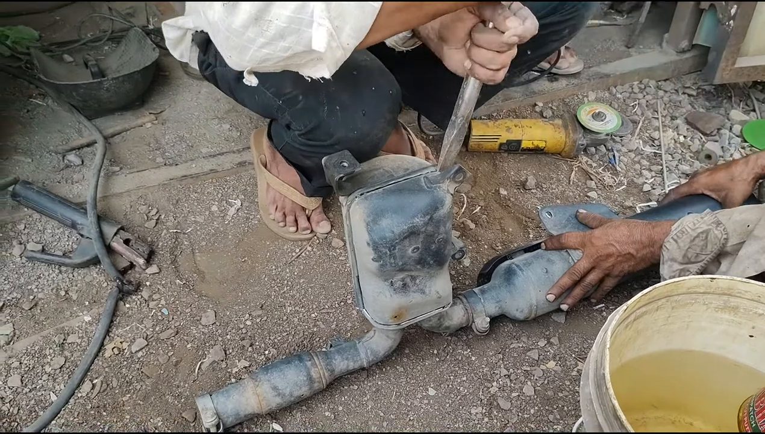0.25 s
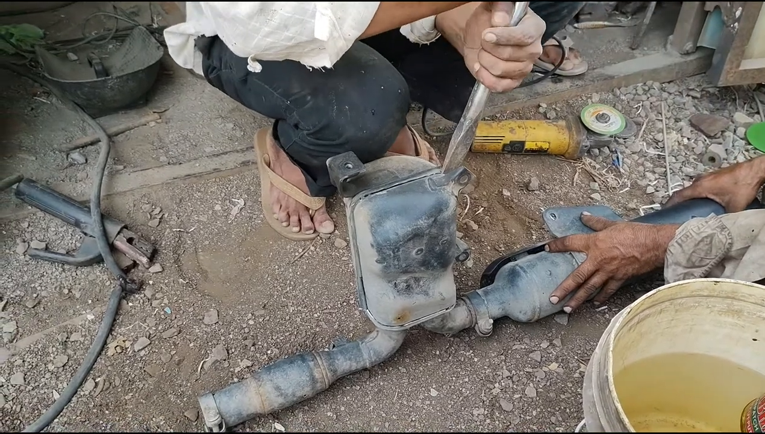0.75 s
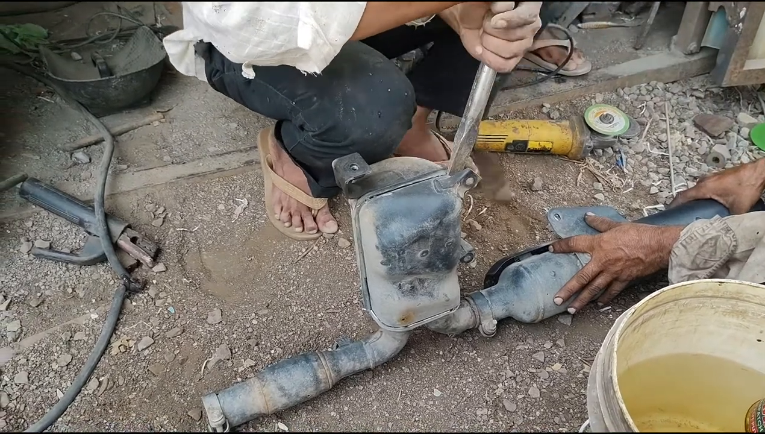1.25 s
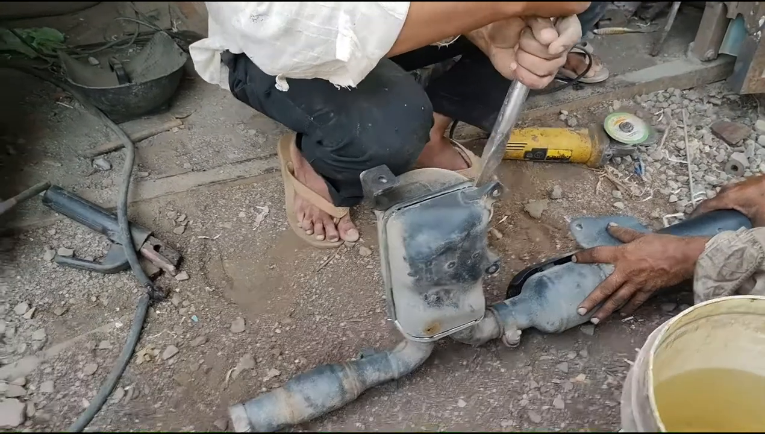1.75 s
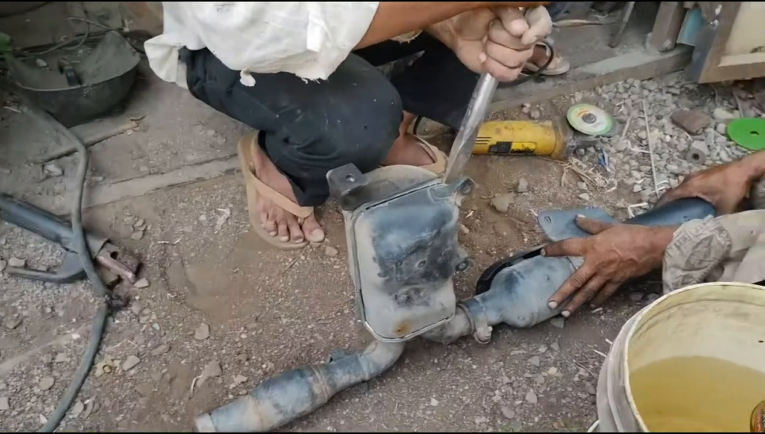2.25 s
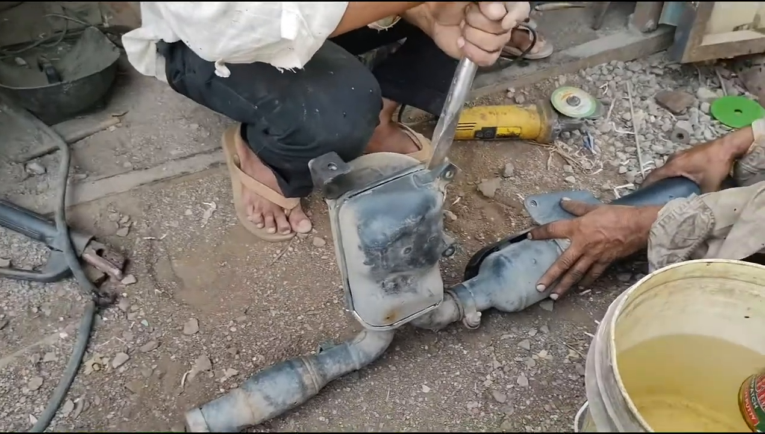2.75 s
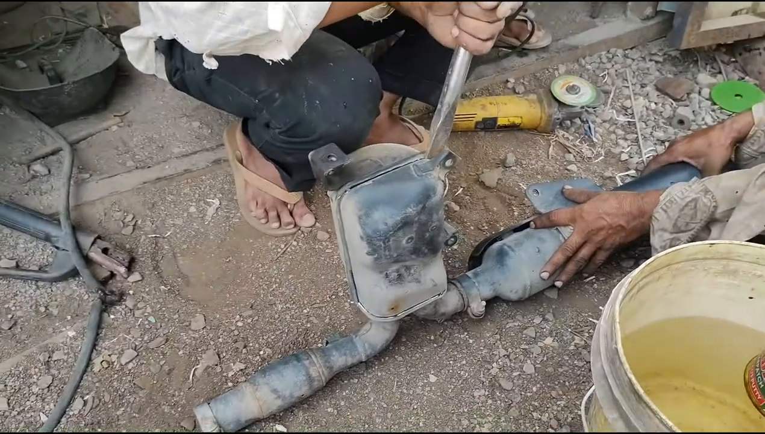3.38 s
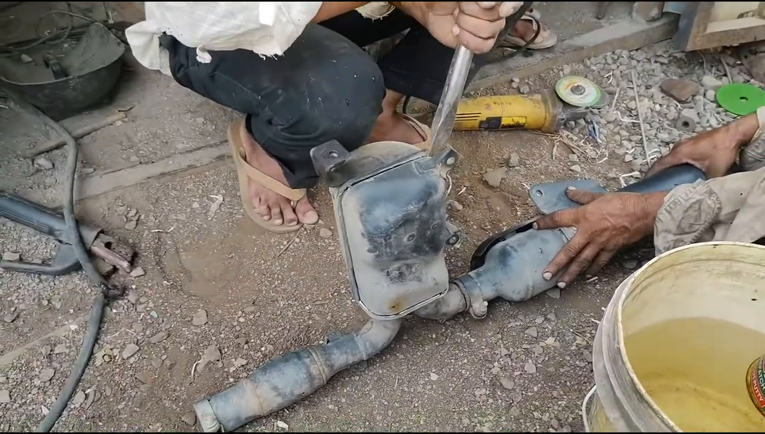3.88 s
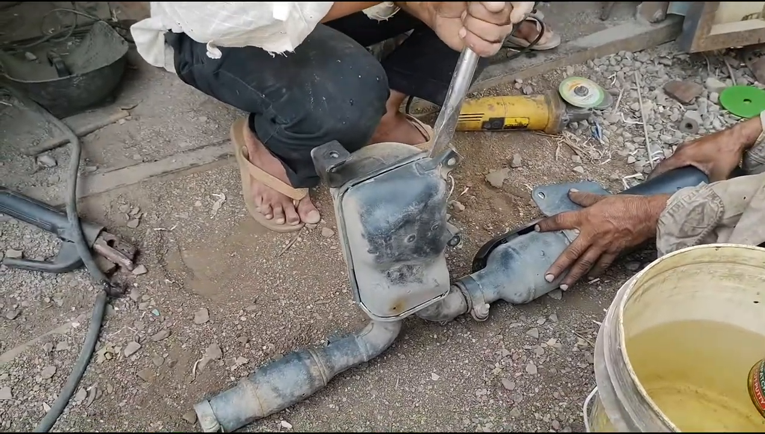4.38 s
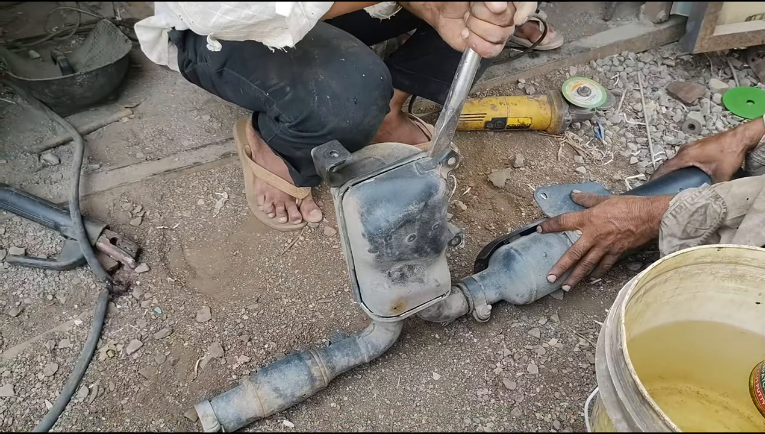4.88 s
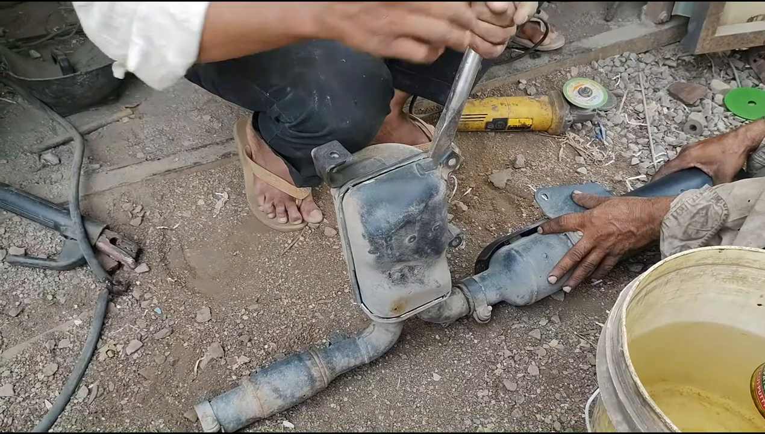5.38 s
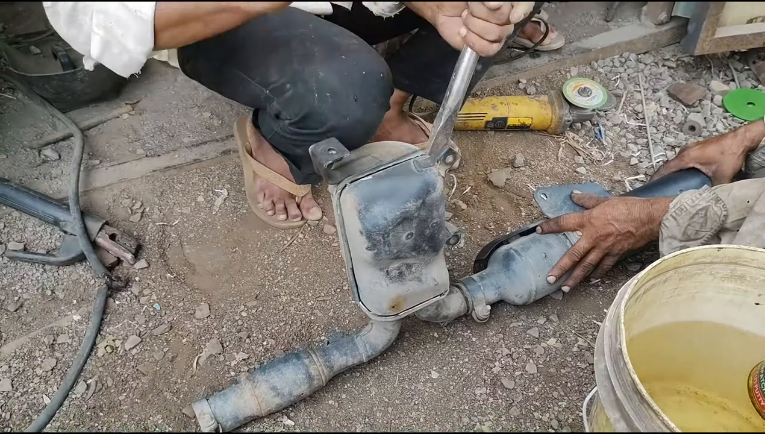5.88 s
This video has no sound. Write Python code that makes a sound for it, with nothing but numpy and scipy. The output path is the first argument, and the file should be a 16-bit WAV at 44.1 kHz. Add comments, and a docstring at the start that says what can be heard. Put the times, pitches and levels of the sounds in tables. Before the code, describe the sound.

Faint distant traffic and hiss fill the first second and a half. Then steel strikes steel, very near and loud: a muffled, wedged clank with a ground thud, followed by eight increasingly bright, clangy blows on thin hollow sheet metal. The last catches slightly and turns deeper. Each has a sharp crack, brief high ping and rattling decay, with slap echoes and a short open-yard tail. Phone-like sound, loud peaks held down.

```python
"""Chiselling open a car muffler in a yard

Close to the microphone, nine hammer blows drive a steel chisel into the seam of a muffler on the ground.
Each blow sums noise bursts and decaying modes of chisel and sheet steel; the edge starts wedged tight, works
free and catches again on the last blow, while the clang deepens as the seam opens. Delayed copies and noise
tails return from the yard; shaped noise makes the road and a faint whine; the phone's limiter ducks the peaks."""
import sys
import numpy as np
from scipy import signal
from scipy.fft import rfft, irfft, next_fast_len
from scipy.io import wavfile
from scipy.ndimage import uniform_filter1d, minimum_filter1d

SR = 44100
rng = np.random.default_rng(int(sys.argv[2]) if len(sys.argv) > 2 else 0)


def bounce(signal):
    """Save signal as a 16-bit WAV file at the path given by the first command-line argument."""
    frames = np.transpose(np.atleast_2d(signal))
    limited = np.clip(frames, -1, 1)
    pcm = np.round(limited * 32767).astype(np.int16)
    wavfile.write(sys.argv[1], SR, pcm)


N = 270333  # length of the scene in samples
RING = 40000  # longest single sound in samples, about 0.9 s
AGE = np.arange(RING) / SR  # seconds since contact


def hammering():
    """Every blow, heard close by and as sent towards the walls; grip and seam opening set its sound."""
    # Hammer blows. Each row: start in seconds, level in dB, grip of the seam on the edge from 0 to 1,
    # clang of the shell in dB, frequency in Hz that the spot under the edge favours.
    blows = [(1.6003, 2.5, 0.86, -6, 690), (2.0621, 6, 0.43, -3, 1230), (2.5248, 4, 0.24, -1.5, 900),
             (3.0088, 2, 0.07, -1, 1146), (3.546, 2.5, 0.09, 0, 485), (4.0777, 1, 0.03, -2, 1452),
             (4.7477, 2, 0.07, 1, 1610), (5.412, 1.55, 0, 0.5, 1353), (6.047, 0.6, 0.28, 3.5, 680)]
    # Colour of the opening seam. Each row: frequency in Hz, gain in dB when shut, gain in dB when open.
    seam = [(547, -0.5, 6), (1350, 3, -4), (2620, -1.33, -1.1), (5400, 0.5, 2), (6600, 1, -0.2)]
    grip_choke_db = -20.5  # on the free ring; goes with the square of the grip
    grip_tilt_db_per_octave, grip_pivot_hz = -7, 2000  # the dulling, also with the square of the grip
    grip_outward_db = -22  # a wedged chisel throws less sound towards the walls, at full grip
    clang_below_hz, thud_db = 2000, 3.5
    length_shut, length_open = 0.66, 0.92  # the steel rings longer as the seam opens (factor on t60)
    boom_shut_db, boom_open_db = -53, -37.5

    near, outward = np.zeros((2, N))
    hz, shut_db, open_db = np.transpose(seam)
    # each blow opens the seam by an equal step
    openings = np.linspace(0, 1, len(blows))
    for (s, db, grip, clang_db, spot_hz), opening in zip(blows, openings):
        dull_db = grip ** 2 * grip_tilt_db_per_octave * np.log2(hz / grip_pivot_hz)
        colour_db = blend(shut_db, open_db, opening) + dull_db + clang_db * (hz < clang_below_hz)
        colour = list(zip(hz, colour_db))
        length = blend(length_shut, length_open, opening)
        free = strike(colour, length, grip ** 2 * grip_choke_db, spot_hz)
        blow = undb(db) * (free + grip * wedge() + undb(thud_db) * grip ** .5 * thud())
        add(near, s, blow + undb(blend(boom_shut_db, boom_open_db, opening)) * boom())
        add(outward, s, blow * undb(grip * grip_outward_db))
    return near, outward


def strike(colour, length, free_db, spot_hz, spot_db=8, spot_width=0.06):
    """Steel meets steel: a hard crack, the rattle of the sheet, and the clear modes of shell and chisel."""
    # Muffler shell. Each row: frequency in Hz, relative level in dB, t60 in seconds before the length factor.
    shell_modes = [(299, -28, 0.18), (324, -6, 0.13), (488, -24, 0.73), (566, -15.5, 0.35),
                   (669.5, -5.5, 0.17), (728, -9, 0.32), (908.6, -8.5, 0.23), (981, -19, 0.69),
                   (1147, -11, 0.52), (1236, -16.5, 0.3), (1312, -18, 0.47), (1398, -3.5, 0.17),
                   (1414, -4.5, 0.46), (1496, -8, 0.47), (1542, -2.5, 0.19), (1755, -22.5, 0.63),
                   (1810, -12, 0.38), (2020, -10, 0.17), (2223, -14, 0.58), (2370, -10.5, 0.66),
                   (2790, -10.5, 0.48), (3090, 3.5, 0.12), (3276, -4, 0.26), (3385, -11, 0.29),
                   (3540, -16.5, 0.077), (3890, -11, 0.1), (4560, -2.5, 0.24), (4290, -12, 0.36),
                   (4720, -14.5, 0.1)]
    # Chisel, split into close groups by the contact.
    # Each row: frequency in Hz, relative level in dB, t60 in seconds before the length factor.
    chisel_modes = [(2529, 0, .42), (2573, -2, .42), (2629, -4, .4), (5609, -11, .22), (5758, -8, .22),
                    (6058, -6, .25), (6153, -7, .23), (6847, -4, .24), (6987, 2, .28), (7062, -1, .28),
                    (7095, 1, .33), (7130, 1, .3), (7246, 1, .28), (7364, -4, .28), (7560, -8, .25)]
    # The chisel's two main mode groups, smeared while its edge chatters on the seam.
    # Each row: frequency in Hz, relative level in dB.
    chatter_points = [(1500, -30), (2200, -25), (2420, 4.5), (2540, -0.5), (2700, -10.5), (3100, -9.5),
                      (5500, -34), (6650, -32), (6950, 2), (7150, 4), (7350, -11), (7750, -12)]
    # Countless weak shell modes that blur into a rattle. Each row: frequency in Hz, relative level in dB.
    rattle_points = [(100, -25), (300, -16.5), (900, 5), (1450, 3), (1950, 1), (2530, 4), (2900, 5.5),
                     (3300, 6), (3900, 2), (4550, 5), (5100, -5.5), (6500, -2), (7100, 6.5), (7800, -9)]
    crack_points = [(150, -11.5), (800, -12.5), (1500, -15.5), (2500, 4.0), (4500, 0.5),
                    (6000, -1.5), (7200, 2.0)]

    # shell modes that swing widest under the edge are driven hardest
    driven = []
    for hz, db, t60 in shell_modes:
        nearness = np.exp(-(np.log(hz / spot_hz) / spot_width) ** 2)
        driven.append((hz, db + spot_db * nearness, t60))
    shell = undb(-25.5) * ring(driven, colour, length, scatter_db=2.5, detune=0.0011, swell_cycles=1.5)
    chisel = undb(-27.5) * ring(chisel_modes, colour, length, scatter_db=3.0, detune=0.0011, swell_cycles=3.5)
    chatter = undb(-20) * blur(chatter_points, colour, patchy_db=1.5, patch_hz=38.1) * fade(0.39 * length)
    ping = undb(-6.5) * blur(chatter_points, colour, patchy_db=1.0, patch_hz=39.6) * fade(0.029)
    rattle = undb(-18.5) * blur(rattle_points, colour, patchy_db=4.5, patch_hz=50.1) * fade(0.35 * length)
    crack = undb(-3.6) * blur(crack_points, colour, patchy_db=8.0, patch_hz=110.5) * fade(0.055)

    # the grip chokes the clear modes most, the rattle and crack only a little
    clear = undb(free_db) * (shell + chisel + chatter + ping)
    rough = undb(0.11 * free_db) * (rattle + crack)
    return (clear + rough) * (1 - np.exp(-AGE / .0007))


def wedge():
    """Chisel and seam ring as one, over a dense clank of the pinched sheet."""
    # Chisel and seam joined while the edge is wedged tight.
    # Each row: frequency in Hz, relative level in dB, t60 in seconds before the length factor and friction.
    wedged_modes = [(537.5, 1.5, 0.066), (668, 0.5, 0.099), (725, -1.5, 0.25), (845, 0.5, 0.17),
                    (1014, -5, 0.41), (1166, 1, 0.13), (1250, -1, 0.22), (1460, 9.5, 0.22),
                    (1687, -7.5, 0.39), (1860, -10.5, 0.18), (2106, -1, 0.13), (2240, 3.5, 0.2),
                    (2620, 2, 0.074), (2740, -1, 0.6), (2896, -4, 0.16), (3173, -1, 0.71), (3444, 3.5, .26),
                    (3290, 3.5, 0.12), (3574, 1, 0.11), (3660, 2.5, 0.4), (4540, -4.5, 0.067),
                    (5270, -5, 0.48), (5630, 3.5, 0.14), (6030, 3, 0.36), (7340, -6, 0.69),
                    (7300, -8, 0.09)]
    tone_colour = [(500, 4.5), (3000, -4), (4000, -3), (5300, -10), (8000, -15)]
    clank_points = [(200, -25.5), (520, 1), (900, 0), (1400, 3.5), (2300, 2), (3600, -1.5),
                    (5000, -20), (8000, -26)]
    clank_colour = [(500, 0.015), (8000, 0.0042)]
    tones = undb(-20.0) * ring(wedged_modes, tone_colour, 0.56, scatter_db=0.0, detune=0.0014, swell_cycles=9.0)
    clank = undb(-18) * blur(clank_points, clank_colour, patchy_db=2.5, patch_hz=58.65)
    clank *= 1 - np.exp(-AGE / 0.0095)
    # friction in the seam soon stops both
    return tones * np.exp(-(AGE / 0.13) ** 2) + clank * np.exp(-(AGE / 0.038) ** 2)


def thud():
    """A wedged chisel drives the whole muffler against the ground."""
    points = [(60, -30.0), (140, -3.0), (230, -4), (300, 3.5), (420, -19), (900, -41)]
    return undb(-30.0) * noise(points, RING) * fade(0.18) * (1 - np.exp(-AGE / 0.017))


def boom(peak_s=.17):
    """A low rumble that swells after a blow and dies slowly."""
    points = [(30, -17.5), (70, -2), (140, -1.5), (250, -18.5), (600, -12), (2000, -65.5)]
    age = AGE / peak_s
    return noise(points, RING) * age ** 2 * np.exp(2 * (1 - age))


def ring(modes, colour, length, scatter_db, detune, swell_cycles):
    """Decaying modes; the edge sits differently at each contact, which shifts their strength and pitch."""
    hz, db, t60 = np.transpose(modes)
    size, shift, phase = rng.standard_normal((len(hz), 3)).T
    gain = undb(db + scatter_db * size) * curve(hz, colour)
    shifted_hz = hz * (1 + detune * shift)
    decay = np.log(1000) / (t60 * length)
    age, out = AGE[:RING // 2].astype(np.float32), np.zeros(RING)
    for g, f, loss, start in np.transpose([gain, shifted_hz, decay, phase]).tolist():
        # the vibration takes some cycles to spread over the steel, so low modes come late
        swell = 1 - np.exp(-np.minimum(f * age / swell_cycles, 20))
        out[:len(age)] += g * swell * np.exp(-loss * age) * np.sin(2 * np.pi * (f * age + start))
    return out


def blur(points, colour, patchy_db, patch_hz):
    """A crowd of close modes, as shaped noise; each contact favours other groups of them."""
    hz = bins(RING)
    knots = np.arange(0, SR / 2, patch_hz)
    patches = np.interp(hz, knots, rng.standard_normal(len(knots)))
    crowd = unit(irfft(rfft(noise(points, RING)) * undb(patchy_db * patches), RING))
    return irfft(rfft(crowd) * curve(hz, colour), RING)


def grit(s=1.8303, db=-37):
    """A small dry tick on the ground: a very short burst of noise."""
    out = np.zeros(N)
    tick = noise([(300, -7), (1700, 9.5), (3000, -23), (7000, -37.0)], RING) * fade(0.0083)
    add(out, s, undb(db) * tick)
    return out


def scuff(s=1.6, length_s=0.16, db=-57):
    """A soft rustle as the first blow lands: noise that swells and sinks once."""
    out = np.zeros(N)
    swell = np.sin(np.pi * np.minimum(AGE / length_s, 1))
    add(out, s, undb(db) * swell * noise([(300, -20), (1300, 3), (2500, -2), (7000, -20)], RING))
    return out


def walls(x):
    """Each wall returns one clean echo and a short spray of scattered ones."""
    # Walls round the yard, about 9 and 18 m away. Each row: echo delay in seconds, clean echo in dB,
    # scatter from the clutter near the wall in dB, its t60 in seconds; levels before the echo colour.
    wall_rows = [(.054, -15, -15, .11), (.108, -11.5, -14, 0.21)]
    # Colour of the wall echoes. Each row: frequency in Hz, gain in dB.
    echo_colour = [(300, 2), (1000, -0.5), (1900, 0.5), (2530, 2.5), (3400, -10.5), (5500, -11), (7100, -2)]
    response = np.zeros(N)
    for delay_s, echo_db, scatter_db, t60 in wall_rows:
        spray = rng.standard_normal(RING) * fade(t60)
        spray /= np.sqrt(np.sum(spray ** 2))
        clean = signal.unit_impulse(RING)
        add(response, delay_s, undb(echo_db) * clean + undb(scatter_db) * spray)
    response = irfft(rfft(response[:RING]) * curve(bins(RING), echo_colour), RING)
    return signal.fftconvolve(x, response)[:N]


def yard(x, low_t60=0.76, high_t60=0.3, split_hz=2600, wet_db=-22.0206):
    """Scattered echoes from walls and clutter, as a noise tail; the treble dies first."""
    low_points = [(100, -3), (1000, 0), (split_hz, -5), (5000, -25), (9000, -40)]
    high_points = [(1000, -8), (split_hz, 0), (7000, -3), (12000, -20)]
    low = noise(low_points, RING) * fade(low_t60)
    high = noise(high_points, RING) * fade(high_t60)
    tail = (low + undb(1.5) * high) * (1 - np.exp(-AGE / 0.019))
    tail /= np.sqrt(np.sum(tail ** 2))
    return undb(wet_db) * signal.fftconvolve(x, tail)[:N]


def road():
    """Engines rumble and tyres wash some way off, over a faint hiss; all are wavering noise."""
    # The road over time. Each row: time in seconds, rumble in dB, tyres in dB; both before the trims.
    road_levels = [(0.0, -51, -56.5), (1.43, -53, -56), (2.2, -50.5, -49.5), (4.71, -58, -49.5),
                   (4.88, -51, -45), (5.74, -47.5, -42.5), (6.13, -51.5, -43)]
    # Steady spectra of rumble, tyres and hiss. Each row: frequency in Hz, relative level in dB.
    rumble_points = [(20, -28.5), (40, -8), (70, 5), (130, -5), (190, -2.5), (280, -16), (600, -32.5)]
    tyre_points = [(100, -4), (300, 4.5), (600, -0.5), (1000, 0), (1600, -6), (2500, -11), (4000, -23.5),
                   (8000, -26)]
    air_points = [(500, 0), (2000, -20), (3000, 1), (4200, 4), (4900, -3), (6200, -2.5), (7100, -0.5),
                  (7800, -8)]
    rumble_trim_db, tyre_trim_db = 0.4, -2.06

    s, *columns = np.transpose(road_levels)
    rumble_db, tyre_db = (np.interp(np.arange(N) / SR, s, c) for c in columns)
    rumble = waver(noise(rumble_points + [(2000, -72.0)], N), depth_db=4.0, rate=15)
    rumble *= undb(rumble_db + rumble_trim_db)
    tyres = noise(tyre_points, N) * undb(tyre_db + tyre_trim_db)
    hiss = undb(-60.5) * noise(air_points, N)
    return rumble + waver(tyres + hiss, depth_db=1.96, rate=11)


def whine(hz=3270, width_hz=25):
    """A faint, unsteady whine that slowly grows: a narrow band of noise."""
    band = [(hz - 8 * width_hz, -70), (hz - width_hz, -6), (hz, 0), (hz + width_hz, -6),
            (hz + 8 * width_hz, -70)]
    return noise(band, N) * undb(np.linspace(-77, -66, N))


def waver(x, depth_db, rate):
    """Let each octave swell and sink on its own."""
    padded = next_fast_len(N, True)
    octave = np.log2(np.clip(bins(padded), 40, 5120) / 40)
    spectrum = rfft(x, padded)
    # triangular bands that overlap and sum to one
    bands = (irfft(spectrum * np.maximum(0, 1 - abs(octave - k)), padded)[:N] for k in range(8))
    return sum(band * undb(depth_db * walk(rate)) for band in bands)


def walk(rate):
    """Smooth random drift from rate fresh values a second."""
    k = int(SR / rate)
    steps = np.repeat(rng.standard_normal(N // k + 1), k)
    return 1.08 * uniform_filter1d(uniform_filter1d(steps, k), k)[:N]


def limiter(x, ceiling=.92, look_ahead_s=.001, release_db_per_s=400):
    """Turn the gain down just ahead of each peak and let it recover at a steady rate."""
    over_db = 20 * np.log10(np.maximum(abs(x) / ceiling, 1))
    recovery_db = release_db_per_s * np.arange(N) / SR
    duck_db = recovery_db - np.maximum.accumulate(over_db + recovery_db)
    size = int(look_ahead_s * SR)
    return x * undb(uniform_filter1d(minimum_filter1d(duck_db, size), size))


def undb(db):
    """Decibels to gain."""
    return 10 ** (np.asarray(db) / 20)


def unit(x):
    """Scale to rms 1."""
    return x / np.sqrt(np.mean(x ** 2))


def blend(first, last, share):
    """The value a share of the way from first to last."""
    return first + share * (last - first)


def curve(hz, points):
    """Gain at hz of (Hz, dB) points joined on a log axis."""
    f, db = np.transpose(points)
    return undb(np.interp(np.log(np.maximum(hz, 1)), np.log(f), db))


def bins(size):
    """Frequencies of a spectrum of size samples."""
    return np.arange(size // 2 + 1) * SR / size


def noise(points, size):
    """Noise of rms 1 with the given spectrum."""
    padded = next_fast_len(size, True)
    spectrum = rfft(rng.standard_normal(padded)) * curve(bins(padded), points)
    return unit(irfft(spectrum, padded)[:size])


def fade(t60):
    """Exponential decay, 60 dB down after t60 seconds."""
    return np.exp(-np.log(1000) * AGE / t60)


def add(out, s, sound):
    """Mix a sound in at time s."""
    i = int(s * SR)
    out[i:i + len(sound)] += sound[:N - i]


def scene():
    """The work close by, its echoes, the road and the whine."""
    near, outward = hammering()
    work = near + grit() + scuff()
    return (work + walls(outward) + yard(work) + road() + whine())[None]


def record(dry, top_hz=7700):
    """The phone limits the loudest peaks, then a steep low-pass cuts what lies above the chisel's ping."""
    held = limiter(dry)
    low_pass = signal.cheby1(12, .3, top_hz, fs=SR, output="sos")
    return signal.sosfilt(low_pass, held)


dry = scene()
out = record(dry)
bounce(out)
```